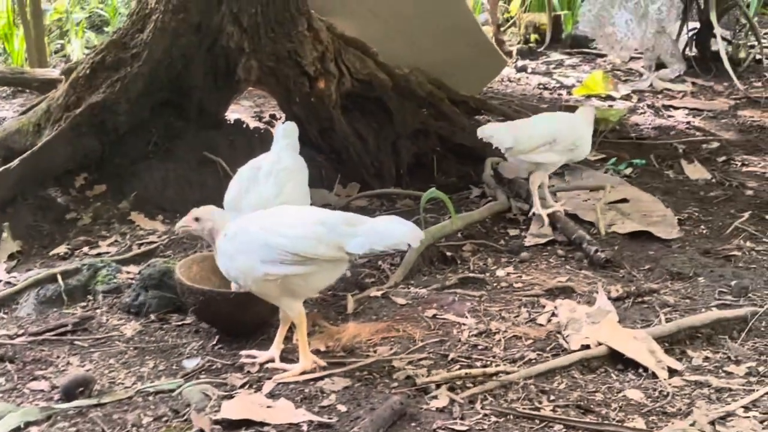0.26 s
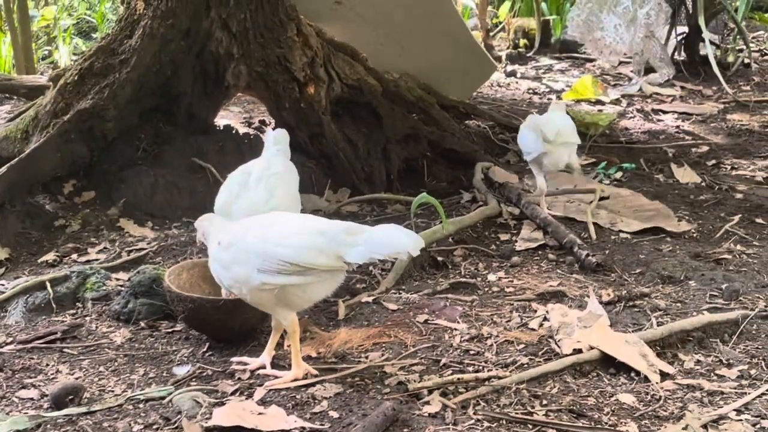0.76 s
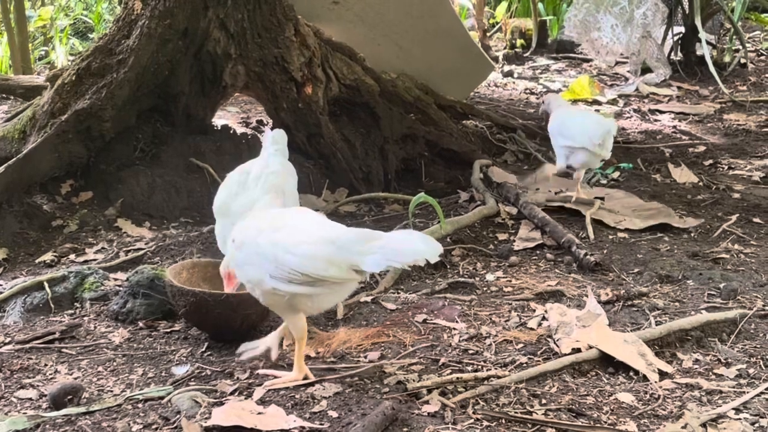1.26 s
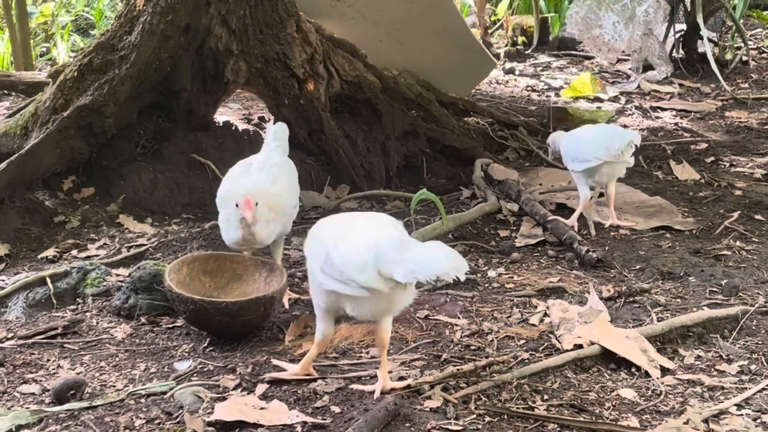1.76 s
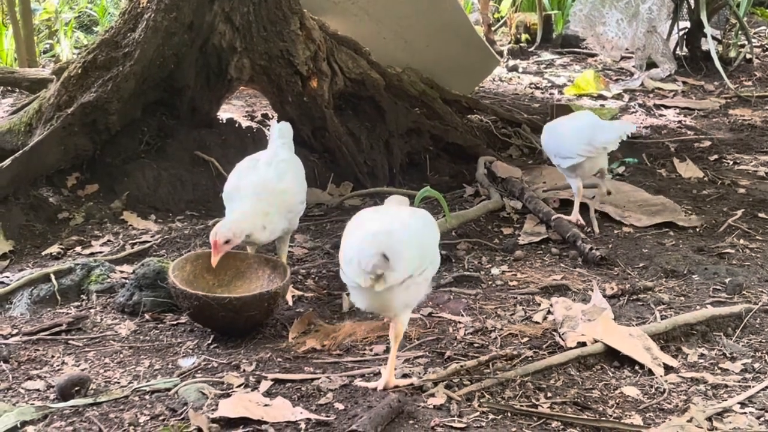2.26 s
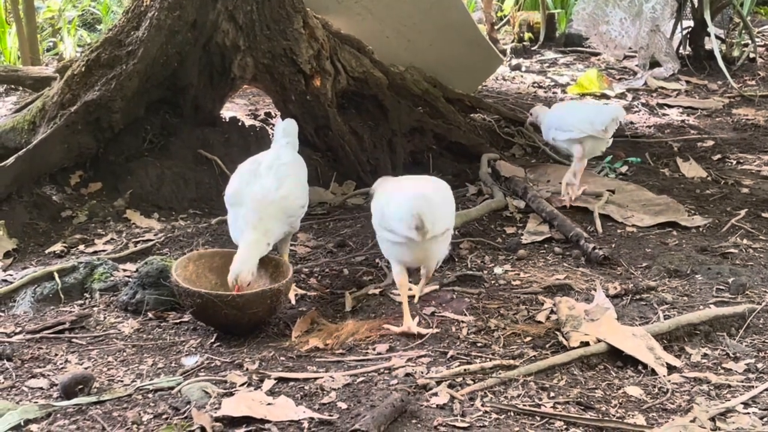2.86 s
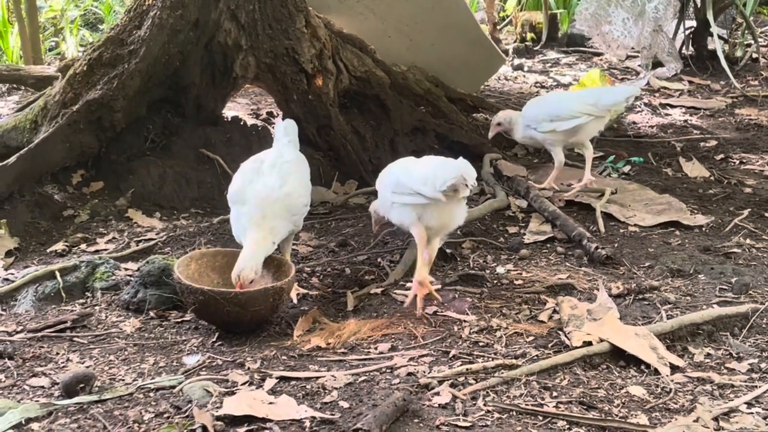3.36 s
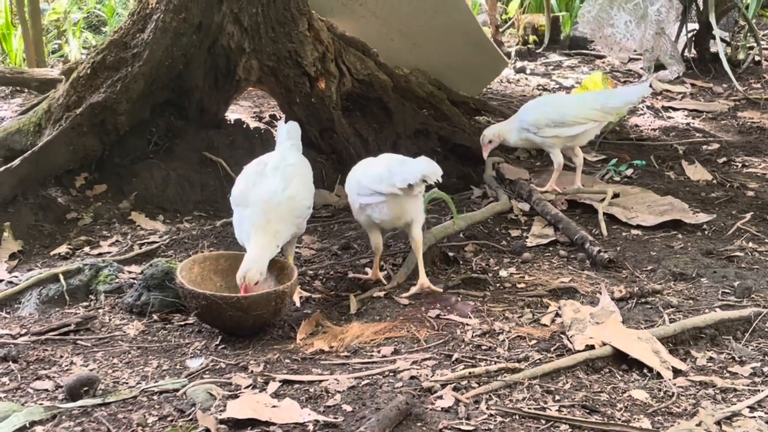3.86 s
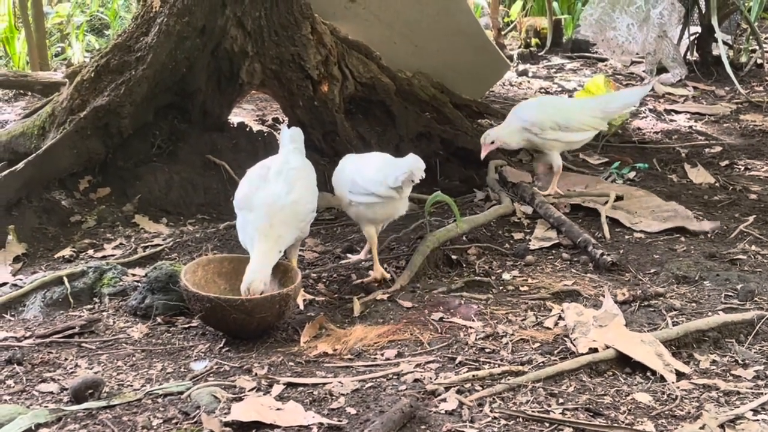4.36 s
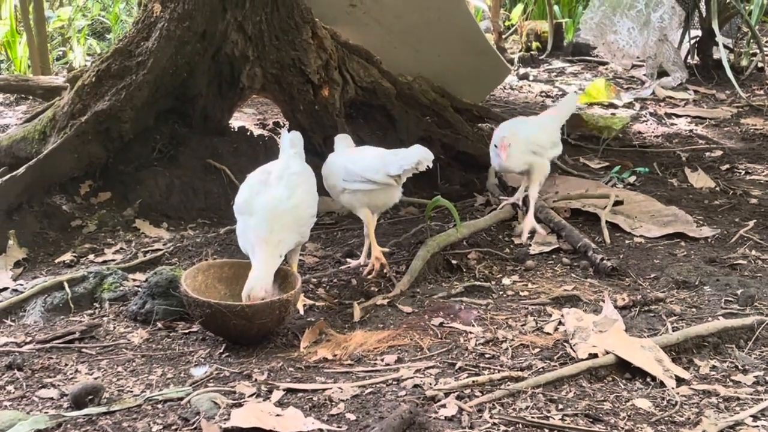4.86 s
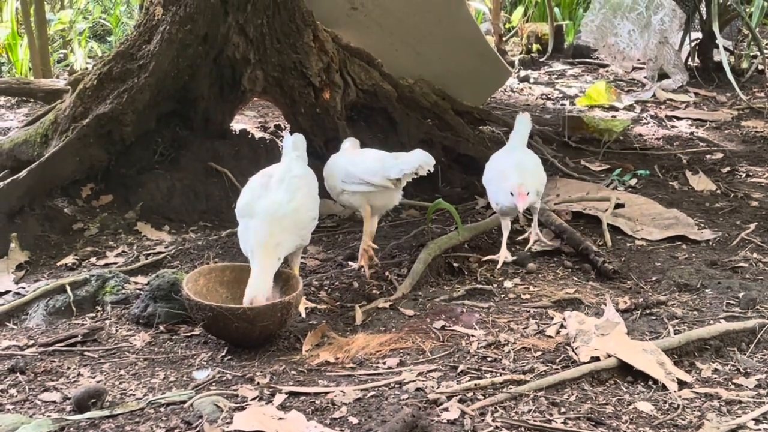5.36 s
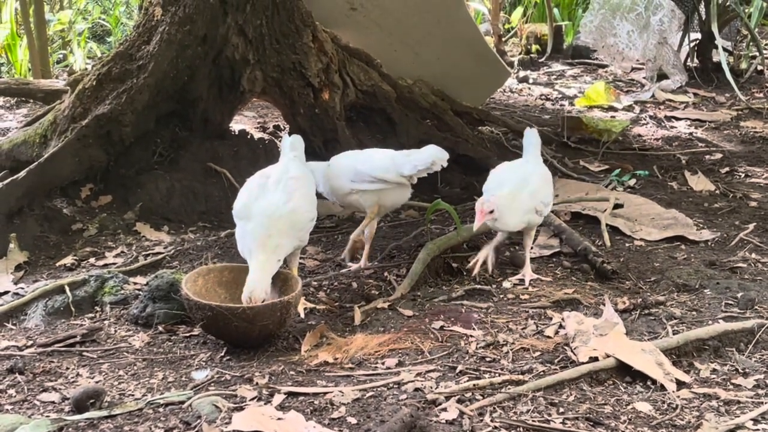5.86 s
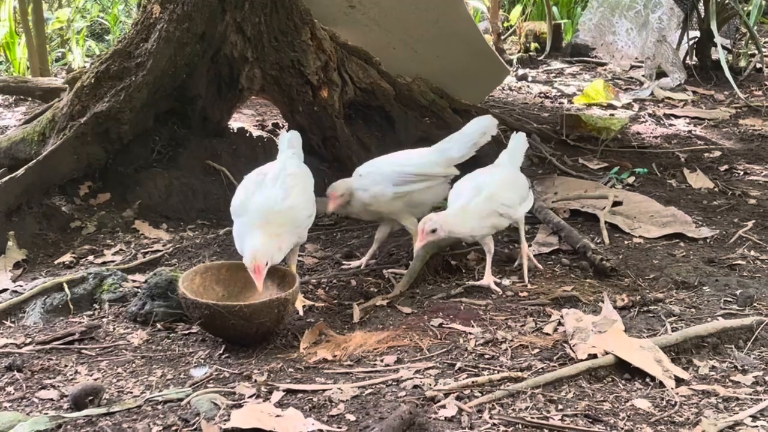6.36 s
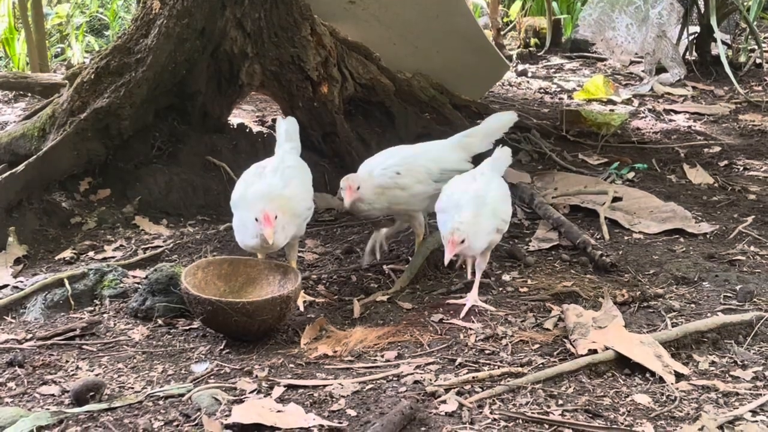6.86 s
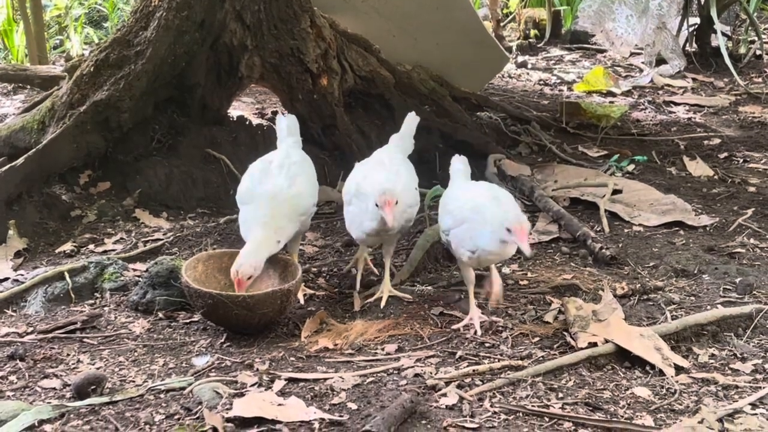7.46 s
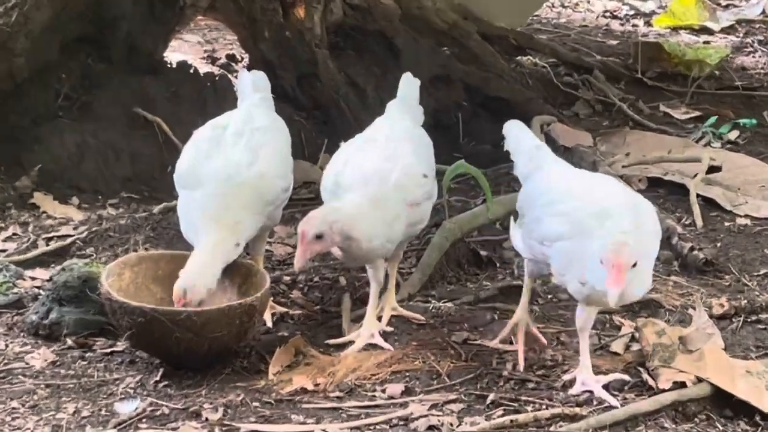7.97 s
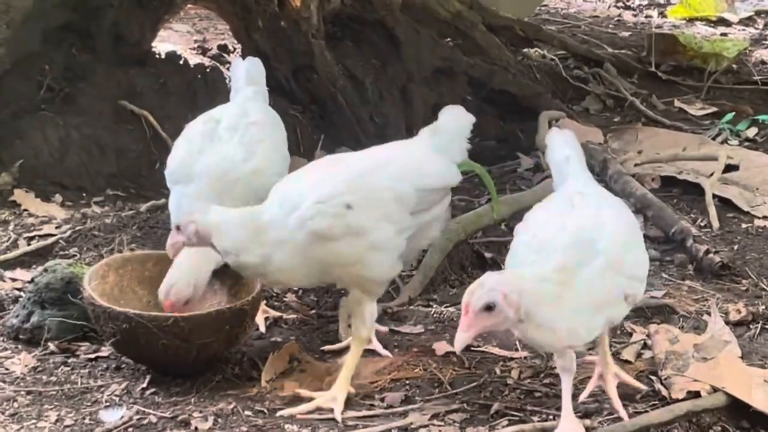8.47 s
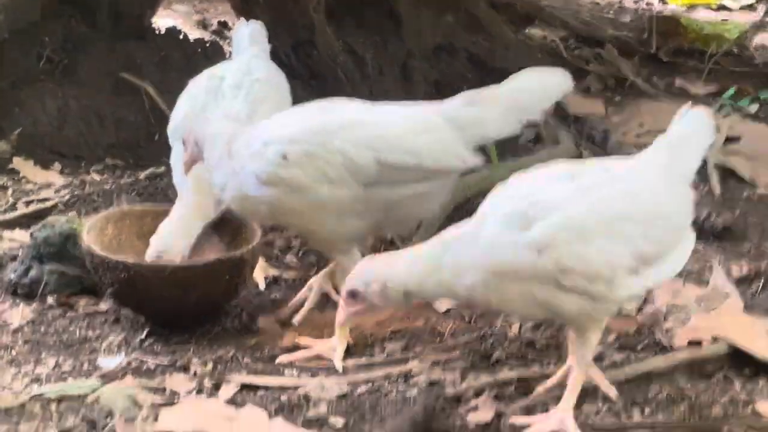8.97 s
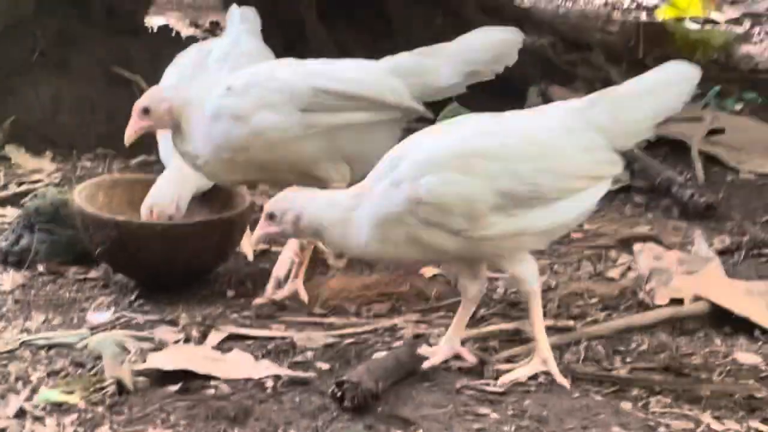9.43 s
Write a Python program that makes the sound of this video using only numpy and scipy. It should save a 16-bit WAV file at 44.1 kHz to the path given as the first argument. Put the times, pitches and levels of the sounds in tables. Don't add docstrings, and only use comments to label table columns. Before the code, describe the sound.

In an outdoor grove, close feet crunch dry leaves, densest from 0 to 1.7 seconds, with sharp twig snaps near 1.1 and 1.3 and hollow bowl taps around 0.4 and 1.1. A hen's short, throaty clucks recur throughout. Thin small-bird whistles appear near 0.9, 1.8, 3.1 and 5.7. A hoarse distant rooster crows from 1.5 to 2.9, echoing among trunks, followed by a very faint call. Short rough notes at 5 lead into another crow from 5.3, clearing into a steady note from 6.5 to 7. Crisp rustling snaps at 7, with tiny peeps and squeaks until 7.7. A louder, catching, raspy crow, slightly left, runs from 7.6 to about 9.2. Quick beak knocks on the shell bowl cluster from 8.8 to 9.7. Traffic rumble, motor hum and soft hiss continue underneath; low wind thumps swell after 8.9.

```python
import sys
import numpy as np
from scipy import signal
from scipy.fft import rfft, irfft
from scipy.io import wavfile

SR = 44100
rng = np.random.default_rng(int(sys.argv[2]) if len(sys.argv) > 2 else 0)


def field_ratio(decibels):
    return 10 ** (np.asarray(decibels, dtype=float) / 20)


def dump(signal):
    limited = np.clip(np.atleast_2d(signal).T, -1, 1)
    pcm = np.round(limited * 32767).astype(np.int16)
    wavfile.write(sys.argv[1], SR, pcm)


N = 427769


def rms_one(x):
    return x / np.sqrt(np.mean(x ** 2) + 1e-20)


def at_hz(points, hz):
    points = np.array(points)
    return np.interp(np.log(hz), np.log(points[:, 0]), points[:, 1])


def drift(rate_hz, size):
    r = np.exp(-2 * np.pi * rate_hz / SR)
    return rms_one(signal.lfilter([1], [1, -2 * r, r * r], rng.standard_normal(size + 9000))[9000:])


def band(x, low_hz, high_hz):
    return signal.sosfilt(signal.butter(2, [low_hz, high_hz], "band", fs=SR, output="sos"), x)


def resonate(x, hz, width_hz):
    r = np.exp(-np.pi * width_hz / SR)
    poles = [1, -2 * r * np.cos(2 * np.pi * hz / SR), r * r]
    return signal.lfilter(np.array([1, 0, -1]) * (1 - r * r) / 2, poles, x)


def add(out, s, sound):
    i = round(s * SR)
    out[max(i, 0):i + len(sound)] += sound[max(-i, 0):N - i]


def coloured(spectrum):
    # hz, likeness (0 to 1)
    likeness = [(60, 0.97), (160, 0.86), (270, 0.72), (2200, 0.68)]
    hz = np.maximum(np.fft.rfftfreq(N, 1 / SR), 1)
    alike = np.clip(at_hz(likeness, hz), 0, 1)
    gain = field_ratio(at_hz(spectrum, hz)) * (hz > spectrum[0][0]) * (hz < spectrum[-1][0])
    mid, side = irfft(rfft(rng.standard_normal((2, N))) * gain * np.sqrt([1 + alike, 1 - alike]), N)
    return np.array([mid + side, mid - side]) / np.std(mid)


def grove(x, wet_db, t60, send=None):
    t = np.arange(SR) / SR
    noise = rng.standard_normal((2, SR))
    noise = rms_one(noise + 0.28 * noise[::-1])
    dull = signal.lfilter([.25], [1, -.75], noise)
    dull_fade = field_ratio(-60 * t / t60)
    bright_fade = 0.5 * field_ratio(-60 * t / 0.54)
    tail = (dull * dull_fade + (noise - dull) * bright_fade) * np.minimum(t / 0.0043, 1)
    tail = field_ratio(wet_db) * tail / np.sqrt(np.sum(dull ** 2 * dull_fade ** 2) / 2)
    source = x if send is None else send
    return x + signal.fftconvolve(source[None], tail, axes=1)[:, :N]


def glides(table, partials_db, wobble, rough=0):
    out = np.zeros(N)
    for s, length, start_hz, end_hz, level_db in table:
        u = np.arange(round(length * SR)) / (length * SR)
        hz = (start_hz + (end_hz - start_hz) * u) * (1 + wobble * drift(8 / length, len(u)))
        phase = 2 * np.pi * np.cumsum(hz) / SR
        tone = sum(field_ratio(db) * np.sin((k + 1) * phase) for k, db in enumerate(partials_db))
        swell = np.sin(np.pi * u) ** .5
        add(out, s, field_ratio(level_db + 2.0) * tone * (1 + rough * drift(130, len(u))) * swell)
    return out


def traffic():
    # start_s, rumble_db, hum_db
    passing = [(0.0, -54, -52), (2.3, -51.5, -80), (3.1, -53, -68), (3.3, -59.5, -51.5),
               (3.8, -49.5, -50.5), (4.6, -49, -46.5), (5.5, -51, -52.5), (6.16, -52.5, -47),
               (6.5, -50.5, -60), (7.62, -49, -45.5), (8.6, -53, -50.5), (9.05, -40, -49),
               (9.27, -48.5, -47), (9.6, -46.5, -53.5)]
    # hz, level_db (per Hz)
    rumble = [(15, -22.5), (25, -87), (43, 6), (91, 13), (112, -6.5), (130, -20), (170, -2), (290, -120)]
    s, *levels = np.transpose(passing)
    rumble_db, hum_db = [np.interp(np.arange(N) / SR, s, level) for level in levels]
    hum_hz = 104.55 + .5 * drift(2.48, N)
    hum = field_ratio(hum_db + 3.0) * np.sin(2 * np.pi * np.cumsum(hum_hz) / SR)
    return field_ratio(rumble_db + 3 * drift(0.67, N)) * coloured(rumble) + hum


def yard_hiss():
    # hz, level_db (per Hz)
    floor = [(90, 28), (160, 23.5), (220, 16.5), (400, 5), (700, 3.5), (1100, -4), (2000, -7), (3200, -11),
             (5000, -16), (7000, -17), (9000, -14), (12500, -32), (15500, -26.5)]
    # start_s, level_db
    air = [(0.0, -59.5), (2.1, -57), (4.3, -68.5), (5.6, -61.5), (7.5, -59.5), (9.1, -61), (9.7, -63)]
    air_db = np.interp(np.arange(N) / SR, *np.transpose(air))
    yard = coloured(floor) * field_ratio(2.5 * drift(2.83, N))
    low = signal.sosfilt(signal.butter(2, 1500, fs=SR, output="sos"), yard)
    litter = (rng.random(N) < 300 / SR) * rng.choice([-1, 1], N)
    litter = litter * field_ratio(4 * np.minimum(rng.exponential(1, N), 3))
    litter = band(band(litter, 2500, 10500), 1500, 11000)
    high = yard - low + 0.031 * rms_one(litter)
    return field_ratio(-56) * (low + field_ratio(0.5 * (air_db + 71.0)) * high)


def insects():
    noise = rng.standard_normal(N)
    shimmer = band(band(noise, 9700, 11300), 9700, 11300)
    return field_ratio(-83.5) * rms_one(shimmer) + field_ratio(-93) * rms_one(resonate(noise, 11050, 150))


def cackles():
    # start_s, peak_db, low_resonance_db
    calls = [(-0.03, -54, 3.5), (1.0294, -52, -2), (1.5384, -49, -3.5), (2.5626, -52.5, -3),
             (2.9762, -51, -3), (3.455, -52.5, -0.5), (3.9147, -52.5, -3), (4.363, -50.5, -2.5),
             (5.43, -58.5, -5), (5.6604, -52.5, -1.5), (6.117, -49, -2), (6.6048, -55.5, 0.5),
             (7.0789, -50.5, -3), (7.6822, -57.5, -10), (9.3033, -55.5, 0.5)]
    # hz, width_hz, level_db
    beak = [(558.8, 34, 2.5), (707, 134, 1), (1132, 158, 1.5), (1512, 126, -7.5), (1890, 193, -4.5),
            (3020, 120, -16.5)]
    t, out = np.arange(round(.2 * SR)) / SR, np.zeros(N)
    for s, peak_db, low_db in calls:
        cycles = np.cumsum((370 - 450 * t) * (1 + 0.0567 * drift(77.4, len(t)))) / SR
        pulses = rms_one(np.diff(np.floor(cycles), prepend=0))
        source = pulses + 1.22 * rng.standard_normal(len(t))
        for hz, width_hz, level_db in beak:
            late = np.maximum(t - 0.017 * (hz > 900), 0)
            effort = late / 0.019 * np.exp(1 - late / 0.029)
            voice = resonate(resonate(source * effort, hz, width_hz), hz, 3 * width_hz)
            add(out, s - .015, field_ratio(peak_db + level_db + low_db * (hz < 900) + 6) * voice)
    return out


def leaves(steps, low_hz, tread_db):
    rise_s = .012
    lead_s = .6 * rise_s
    t, out = np.arange(round(.25 * SR)) / SR, np.zeros(N)
    for s, peak_db, t60 in steps:
        cracks = (rng.random(len(t)) < 5000 / SR) * rng.choice([-1, 1], len(t))
        cracks = cracks * field_ratio(3 * rng.exponential(1, len(t)))
        fade = field_ratio(-60 * (t / max(t60, .01)) ** 1.214) * np.minimum(t / rise_s, 1) ** 2
        burst = rms_one((cracks + rng.standard_normal(len(t))) * fade) * np.std(fade)
        burst[round(lead_s * SR)] += 6.5 * rng.uniform(0.34, 1)
        bright = band(band(burst, low_hz, 5460), 0.88 * low_hz, 11200)
        bright = bright + field_ratio(-4.0) * band(burst, 7850, 10350) + field_ratio(-8.5) * band(burst, 8100, 13760)
        bright = bright + field_ratio(-9.5) * band(band(burst, 14000, 15700), 14000, 15700)
        tread = field_ratio(tread_db + peak_db + 46.0) * band(burst, 740, 1110)
        add(out, s - lead_s, field_ratio(peak_db) * bright + tread)
    return out


def footsteps():
    # start_s, peak_db, t60_s
    steps = [(0.04, -52, 0.3), (0.169, -41, 0.081), (.177, -51.5, 0.16), (0.2763, -41, 0.045),
             (.375, -53.5, 0.15), (0.5165, -40.5, 0.1), (0.56, -46.5, 0.65), (.8056, -50.5, 0.035),
             (0.821, -40, 0.12), (.845, -47, 0.24), (1.0096, -47, 0.28), (1.11, -44, 0.31),
             (1.1398, -27.5, 0.044), (1.2877, -45, 0.18), (1.3084, -31, 0.1), (1.33, -34.5, 0.058),
             (1.3882, -42.5, 0.062), (1.459, -44.5, 0.2), (1.485, -49.5, 0.08), (1.654, -35.5, 0.094),
             (2.187, -44, 0.067), (2.578, -50.5, 0.11), (3.1039, -38.5, 0.049), (3.287, -53, 0.087),
             (3.6368, -44, 0.13), (4.095, -55, 0.13), (4.155, -54, .02), (4.295, -51.5, 0.19),
             (4.3228, -41, 0.09), (4.894, -55, 0.3), (6.2288, -40.5, .16), (6.6495, -45, 0.28),
             (9.2661, -49, 0.1)]
    return leaves(steps, low_hz=1500, tread_db=-47.5)


def bowl():
    # start_s, peak_db, ring_hz
    pecks = [(0.411, -43, 716), (0.501, -46, 1170), (1.141, -31, 710), (4.323, -49, 1540),
             (8.779, -39, 821), (8.863, -44, 850), (8.908, -35, 830), (8.942, -55, 880), (8.963, -31, 813),
             (8.979, -35.5, 810), (9.109, -49, 840), (9.171, -46, 750), (9.241, -42.5, 790),
             (9.415, -41, 735), (9.658, -45.5, 770)]
    t = np.arange(1300)
    out, click = np.zeros(N), np.exp(-t / 6.2) - np.exp(-t / 3.3)
    for s, peak_db, hz in pecks:
        knock = resonate(click, hz, 108) + 0.46 * resonate(click, 2.07 * hz, 380)
        knock = knock + 0.12 * resonate(click, 360, 160)
        knock = band(knock, 265, 2620)
        add(out, s, field_ratio(peak_db) * knock / np.max(np.abs(knock)))
    return out


def motors():
    # start_s, length_s, start_hz, end_hz, level_db
    drones = [(.25, 0.95, 208.7, 209.8, -60), (1.3, 0.4, 202, 222, -62), (2.3, 0.42, 207.4, 203.5, -60),
              (3.4, 1.58, 183.4, 174.7, -71), (4.8, 1.45, 202, 204.8, -70),
              (5.4, 1.84, 176.2, 169.8, -60.5), (7.7, 1.64, 150.2, 167.1, -57.5),
              (9.15, 0.34, 166.3, 166.7, -57.5), (4.0, 1.71, 132.4, 139.7, -61.5),
              (2.2, 1.23, 60.03, 57.7, -50.5), (8.92, 0.27, 51, 60.6, -39), (9.42, 0.22, 49, 57.4, -36.5)]
    return glides(drones, [0], wobble=0.009)


def small_bird():
    # start_s, length_s, start_hz, end_hz, level_db
    notes = [(.725, 0.05, 5050, 5620, -63), (.76, .05, 5350, 5000, -67), (.918, 0.043, 4180, 5250, -59.5),
             (.962, 0.04, 5280, 5270, -54.5), (1.73, 0.071, 4040, 5050, -61), (1.8, 0.037, 5050, 5060, -68),
             (2.96, 0.11, 5260, 5310, -66), (3.14, 0.05, 4180, 5300, -59), (3.185, 0.077, 5320, 5210, -61),
             (5.7, 0.077, 4200, 5170, -67), (5.76, 0.047, 5300, 5180, -58), (7.52, 0.12, 6570, 7200, -66)]
    return glides(notes, [-5], wobble=0.004, rough=.45)


def thuds():
    # start_s, length_s, level_db
    puffs = [
        (7.43, 0.092, -50),
        (6.9, 0.31, -57),
        (1.25, 0.21, -60),
        (9.2, 0.094, -53.5),
        (6.9, 0.03, -73),
        (1.1, 0.049, -60),
    ]
    out = np.zeros(N)
    for s, length, level_db in puffs:
        size = round(length * SR)
        puff = rms_one(band(rng.standard_normal(size), 120, 310))
        add(out, s, field_ratio(level_db) * puff * np.hanning(size))
    return out


def catches(t, lumps):
    # start_s, peak_db
    near_bursts = [(7.926, -49), (7.951, -36.5), (7.9702, -44), (7.983, -42), (8.0296, -43), (8.091, -35),
                   (8.103, -37), (8.125, -33), (8.152, -34), (8.187, -34), (8.2127, -36), (8.2443, -36),
                   (8.257, -26), (8.2815, -28.5), (8.3239, -39), (8.3549, -29), (8.3807, -24.5),
                   (8.406, -27), (8.4945, -42), (8.5097, -27), (8.536, -25.5), (8.5593, -25.5),
                   (8.5814, -30), (8.5971, -28.5), (8.6183, -35), (8.6384, -30.5), (8.6633, -24.5),
                   (8.685, -45), (8.733, -38), (8.7617, -27.5), (8.7834, -43), (8.8223, -27), (8.86, -33),
                   (8.901, -32), (8.9425, -41), (8.955, -36), (8.9665, -26.5), (9.0139, -31), (9.029, -37)]
    # start_s, peak_db
    far_bursts = [(1.489, -43), (1.5238, -45), (1.5488, -46), (1.5752, -45), (1.5886, -45), (1.655, -38),
                  (1.7318, -40), (1.7812, -47), (1.8426, -44), (1.8755, -43), (1.8964, -46), (1.9164, -52),
                  (1.9498, -45), (1.966, -40), (2.002, -46), (2.0311, -43), (2.076, -46), (2.0945, -46),
                  (2.12, -40), (2.1441, -47), (2.2012, -41), (2.2312, -36.5), (2.26, -37), (2.287, -48),
                  (2.344, -36), (2.4048, -42), (2.4337, -46), (2.4532, -46), (2.5205, -46), (2.5559, -49),
                  (2.5684, -46), (2.6231, -46), (2.6966, -49), (2.7395, -44)]
    swells = np.zeros(N)
    for s, peak_db in near_bursts + [(s, db + 9) for s, db in far_bursts]:
        add(swells, s - .004, field_ratio(peak_db + 31) * np.hanning(round(.016 * SR)))
    return .4 * lumps + 1.7 * swells[(t * SR).astype(int)]


def crows():
    # start_s, pitch_hz, effort_db, closed-beak chest_db (over effort),
    # beak opening open_db (brightness)
    first_crow = [(1.47, 853, -55, -16, -36), (1.6, 834.4, -58, -11, -8), (1.68, 786.5, -63, -1, -4),
                  (1.85, 895.3, -56.5, -9.5, -12), (2.15, 924.6, -52.5, -8, -4), (2.35, 919, -53.5, -5, -5),
                  (2.5, 855, -54.5, -9.5, -14), (2.68, 736, -60, -11, -23), (2.9, 677, -63.5, -7.5, -1)]
    faint_crow = [(3.2, 915, -90, -16, 0.0095), (3.299, 880, -66, -28, 0), (3.448, 834, -79, -5, 0),
                  (3.6, 812, -74, -20, 0)]
    short_notes = [(5.0, 593, -72, -16, 0), (5.05, 594, -64, -16, 0), (5.1, 610, -69, -3, 0),
                   (5.16, 605, -64.5, -14, 0), (5.23, 590, -74, -14, 0)]
    second_crow = [(5.3, 812, -59.5, -0.5, -7), (5.378, 840, -63, -4, 6), (5.498, 822.4, -63.5, 5, 7),
                   (5.719, 889, -55, -7, -10), (5.847, 854.3, -59, -10.5, -4), (6.0, 843, -60.5, -1, -5),
                   (6.12, 834, -66, 3, -5), (6.25, 812.6, -59.5, -22, -29), (6.42, 821, -62, -16, -24)]
    clear_tail = [(6.48, 822, -60, -8, -8), (6.531, 820, -45.5, -25, -4), (6.61, 817, -46, -18, -5),
                  (6.7, 817, -44, -18, -2), (6.8, 812, -47, -12, 4), (6.85, 807.7, -47, -17, -5),
                  (6.935, 809, -55.5, -7, -4), (6.975, 807, -45.5, -14.5, -7), (7.035, 800, -66, -7, -8)]
    near_opening = [(7.64, 976.5, -51.5, -7.5, -6), (7.697, 976, -53.5, -4, 6), (7.777, 990.6, -59, -5, 10),
                    (7.89, 917, -62, -27, -5)]
    near_crow = [(7.9, 955, -41, -12, -3), (7.977, 1039, -35.5, -19.5, -4), (8.091, 984, -37, -15, -5.5),
                 (8.25, 968, -38.5, -12.5, 2.5), (8.402, 959.3, -40.5, -16, 0.5), (8.5, 958, -42.5, -20, 2),
                 (8.618, 955, -41, -14.5, -2)]
    near_ending = [(8.605, 951, -40.5, -16, -10.5), (8.7, 941.5, -45, -10, 3), (8.799, 934, -39, -16.5, -3),
                   (8.87, 912.3, -40.5, -12.5, 1.5), (8.96, 873, -44.5, -25, 5.5),
                   (9.05, 855, -58, -7, 15.5), (9.15, 854, -76, -9, 7), (9.3, 877, -55, -12, -13)]
    # third_db (over effort), fourth_db (over third), high_db (over effort),
    # partial the beak favours at first, at last (multiples of the pitch)
    throats = [(-15.5, -5.5, -15.5, 5.0, 5.6), (-38, -5, -38, 5.8, 5.8), (-10, -6, -50, 8.3, 7.5),
               (-17.5, 9, -24.5, 7.8, 7.5), (-42.5, 10, -33.5, 8.0, 9.5), (-3.5, -8, -21, 7.2, 7.5),
               (-24.5, -4, -24, 4.6, 5.4), (-23.5, -6, -23.5, 6.1, 5)]
    hoarse_points = [
        (.9, 1.2, 1.0, 1.1, 1.35),
        (.7,),
        (.95,),
        (.95, .95, .8, .9),
        (.3, .03, .03, .05, .4),
        (1.0, 1.25, 1.15),
        (1.0, .85, .75, .9, 1.15, 1.15, .9),
        (.8, .45, .8, .9, .8),
    ]
    echoes_db = [-1, -3, -3, -3, -12, -2, -9, -8]
    breaths = [first_crow, faint_crow, short_notes, second_crow,
               clear_tail, near_opening, near_crow, near_ending]
    catching = (0, 6, 7)
    out, send = np.zeros((2, N))
    for i, rows in enumerate(breaths):
        third_db, fourth_db, high_db, *favoured = throats[i]
        s, *columns = np.transpose(rows)
        t = np.arange(s[0], s[-1], 1 / SR)
        size = len(t)
        hz, effort_db, chest_db, open_db = [np.interp(t, s, c) for c in columns]
        hoarse = np.interp(t, np.linspace(s[0], s[-1], len(hoarse_points[i])), hoarse_points[i])

        phase = 2 * np.pi * np.cumsum(hz * (1 + .016 * hoarse * drift(40, size))) / SR
        lumps = rms_one(field_ratio(3 * hoarse * drift(30, size)) * (1 + hoarse * drift(90, size)))
        bursts = catches(t, lumps) if i in catching else lumps
        rasp = 1 + .24 * hoarse ** 2 * drift(300, size)
        torn = phase + .14 * np.minimum(hoarse, 1) ** 2 * drift(90, size)

        second = band(field_ratio(effort_db) * np.sin(2 * phase) * bursts * rasp, 1174, 2006)
        flutter = 1 + .9 * hoarse ** 2 * drift(60, size)
        chest = band(field_ratio(effort_db + chest_db) * np.sin(phase) * flutter * rasp, 580, 1700)
        windpipe = resonate(rng.standard_normal(size), 1.76 * hz.mean(), 750)
        windpipe = rms_one(band(windpipe, 1230, 3300)) * (0.48 + .3 * lumps)
        low = chest + 1.113 * second + field_ratio(effort_db - 16) * hoarse ** 3 * windpipe

        middle = np.sin(3 * torn) + field_ratio(fourth_db) * np.sin(4 * torn + 1)
        beak = np.linspace(*favoured, size)
        knots = np.arange(s[0], s[-1] + 1, 1 / 7)
        high = np.zeros(size)
        for k in range(5, 16):
            lift = field_ratio(-4.5 - 1.1 * k) + 1 / (1 + ((k - beak) / 0.5) ** 2)
            fade = field_ratio(2.5 * np.interp(t, knots, rng.standard_normal(len(knots))))
            high += lift * fade * np.sin(k * torn + k * k)
        breath = field_ratio(-26.5) * hoarse ** 3 * rms_one(band(rng.standard_normal(size), 3900, 5800))
        upper = field_ratio(third_db - .5 * open_db) * middle + field_ratio(high_db) * high + breath
        upper = field_ratio(effort_db + open_db) * upper * (.75 + .25 * lumps)

        edges = np.clip(np.minimum(t - s[0], s[-1] - t) / 0.016, 0, 1)
        voice = (low + upper) * edges
        add(out, s[0], 1.144 * voice)
        add(send, s[0], 1.735 * field_ratio(echoes_db[i]) * voice)
    return out, send


def far_partials():
    # start_s, length_s, start_hz, end_hz, level_db
    partials = [
        (1.62, 0.21, 2930, 2860, -73),
        (2.42, 0.24, 3440, 3220, -89),
        (2.74, 0.18, 2890, 2840, -78.5),
        (2.78, 0.13, 4030, 3960, -83),
        (2.61, 0.047, 1637, 1605, -64),
        (5.35, 0.29, 2220, 2373, -72.5),
    ]
    return glides(partials, [6], wobble=0.024, rough=0.66)


def rustles():
    # start_s, peak_db, t60_s
    shifts = [(1.5823, -36.5, 0.063), (6.1674, -44, 0.051), (6.555, -56, 0.037), (7.003, -29, 0.047),
              (7.009, -26.5, 0.047), (7.022, -39, 0.06), (7.034, -40, 0.04), (7.135, -58, 0.02),
              (7.14, -54, .02), (7.444, -47, 0.034), (7.617, -60, .03), (7.24, -57, 0.026),
              (8.852, -39, .026), (9.318, -49, 0.044), (9.5467, -55, .05)]
    return leaves(shifts, low_hz=2600, tread_db=-52)


def peeps():
    # start_s, length_s, start_hz, end_hz, level_db
    notes = [
        (5.242, 0.029, 1398, 1376, -50),
        (7.434, 0.012, 2380, 2440, -45.5),
        (7.575, 0.047, 660, 650, -56.5),
        (7.045, .055, 1612, 1605, -48.5),
        (7.7, 0.043, 1605, 1600, -47),
        (5.225, 0.02, 2100, 2330, -61),
        (6.95, 0.091, 1700, 920, -59),
    ]
    return glides(notes, [0], wobble=.01)


def squeaks():
    # start_s, length_s, start_hz, end_hz, level_db
    cries = [
        (5.243, 0.017, 1440, 1370, -51.5),
        (7.449, .022, 1520, 1000, -48),
        (7.025, 0.019, 1300, 1350, -55),
    ]
    return glides(cries, [0, -1, -10, -24], wobble=0.006, rough=.5)


def scene():
    background = traffic() + motors() + yard_hiss()
    voices, send = crows()
    cocks = grove(voices, wet_db=-0.5, t60=0.65, send=send + far_partials())
    last_caller = np.arange(N) > 7.6 * SR
    cocks = cocks + 0.52 * band(cocks, 1030, 2160) * last_caller * [[1], [-1]]
    hen = grove(cackles(), wet_db=1.0, t60=0.94)
    bird = grove(small_bird(), wet_db=-1, t60=0.55)
    near = footsteps() + rustles() + peeps() + thuds() + bowl() + squeaks()
    return cocks + hen + bird + grove(near, wet_db=-15, t60=0.32) + background + insects()


def roll_off(x):
    return signal.sosfilt(signal.butter(12, 15730, fs=SR, output="sos"), x)


def record(dry):
    # hz, lag (half turns)
    lag = [(6200, 0), (7320, .54), (7750, .99), (8870, 1.05), (10700, 1.94), (12300, 2.04), (13900, 2.9),
           (14400, 3.1), (16000, 3.14)]
    hz = np.fft.rfftfreq(N, 1 / SR)
    mid, side = rfft((dry[0] + dry[1]) / 2), rfft((dry[0] - dry[1]) / 2)
    side = side / (1 + (hz / 2560) ** 24)
    turn = np.exp(-.5j * np.pi * at_hz(lag, hz + 1))
    return roll_off(irfft([mid * turn + side, mid / turn - side], N))


dry = scene()
out = record(dry)
dump(out)
```